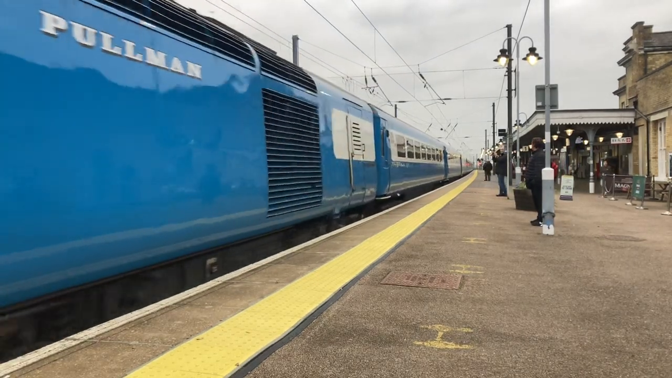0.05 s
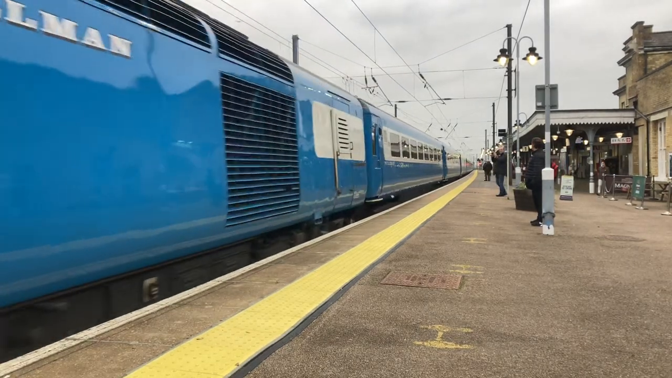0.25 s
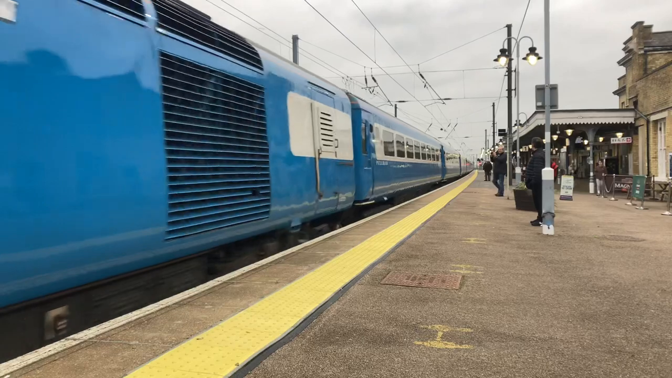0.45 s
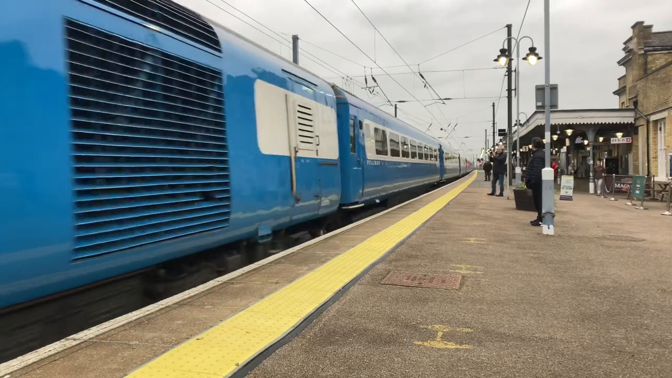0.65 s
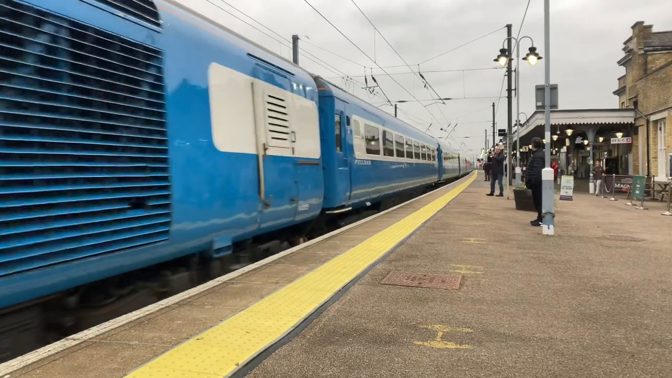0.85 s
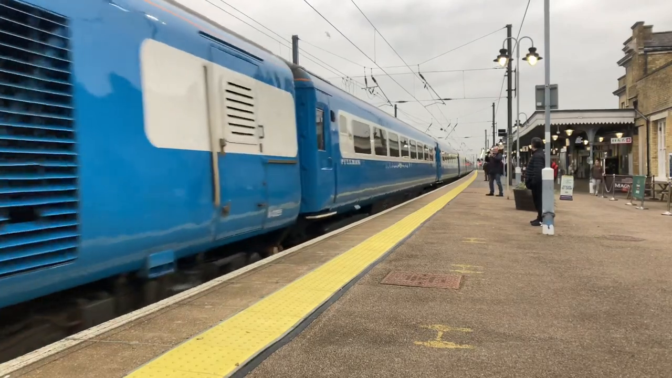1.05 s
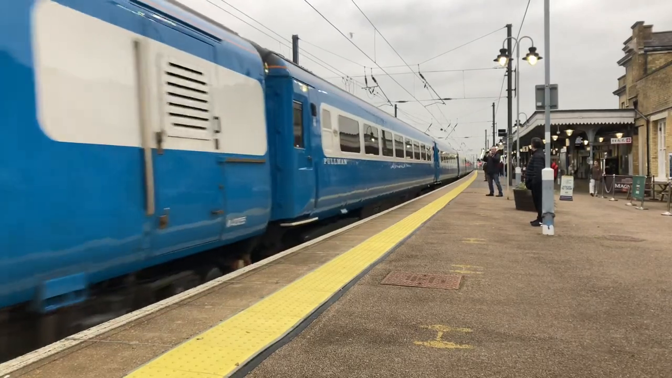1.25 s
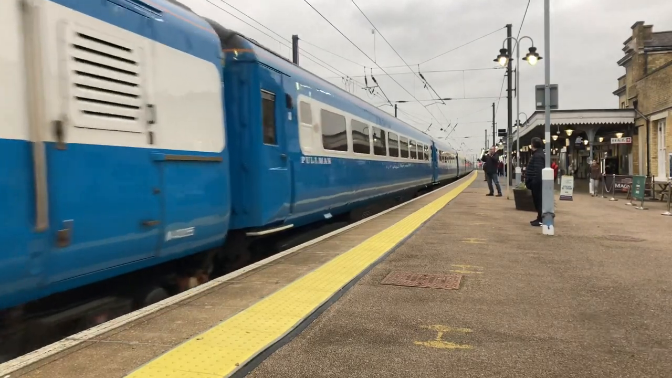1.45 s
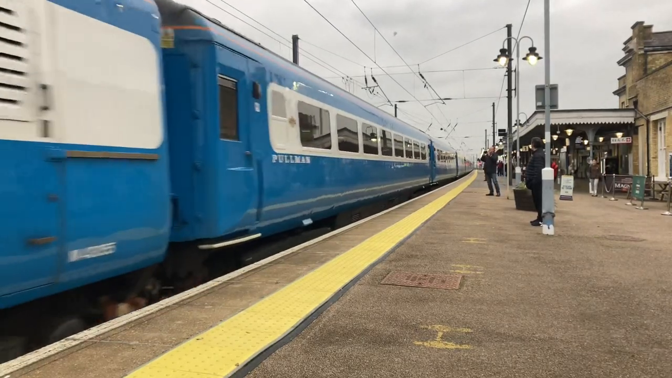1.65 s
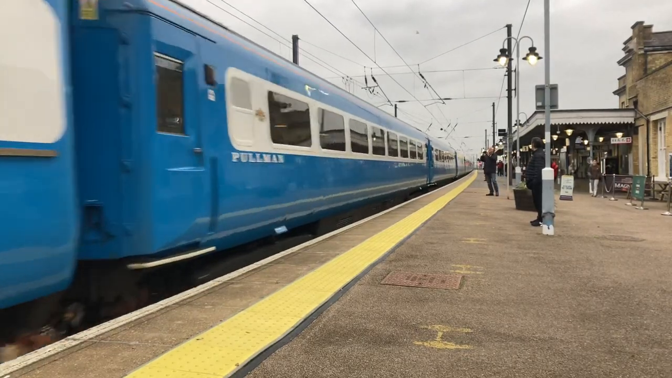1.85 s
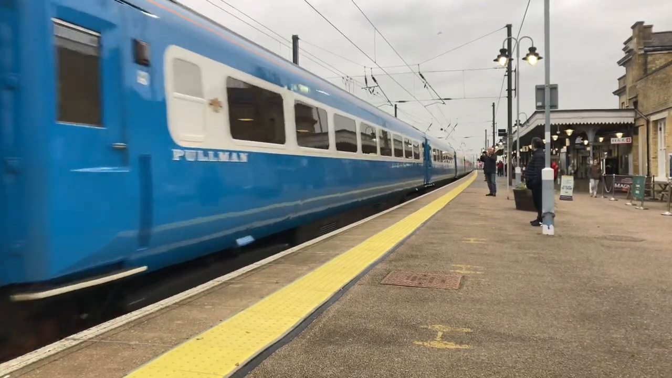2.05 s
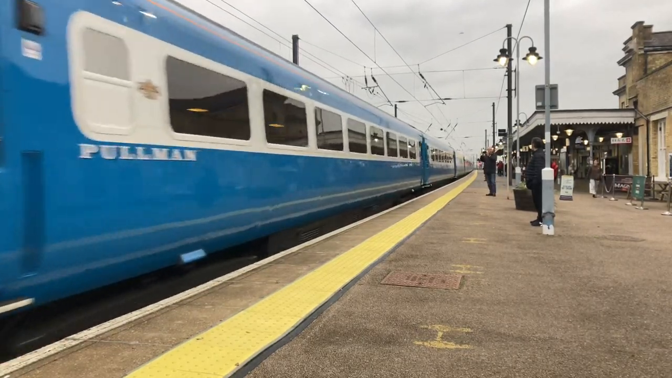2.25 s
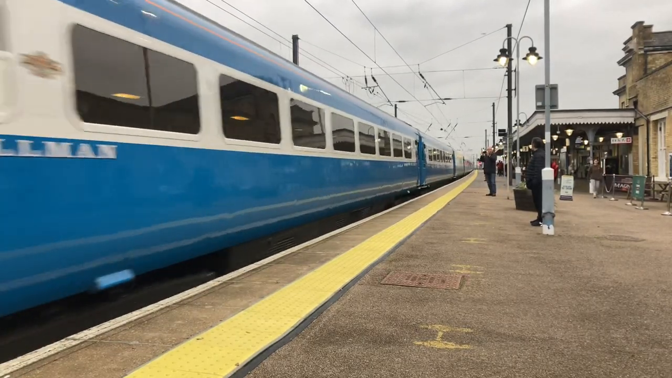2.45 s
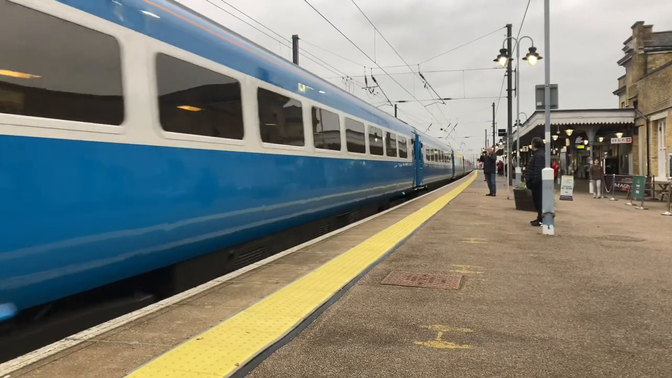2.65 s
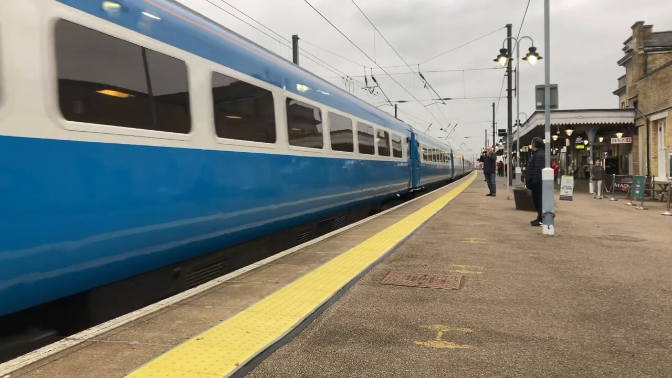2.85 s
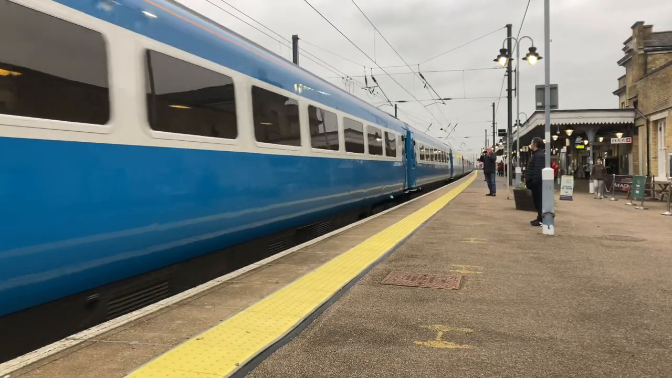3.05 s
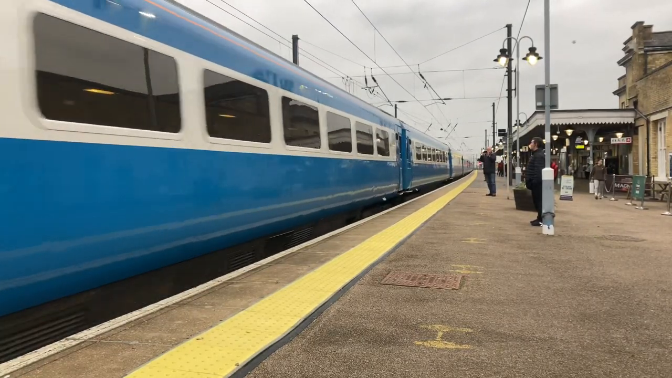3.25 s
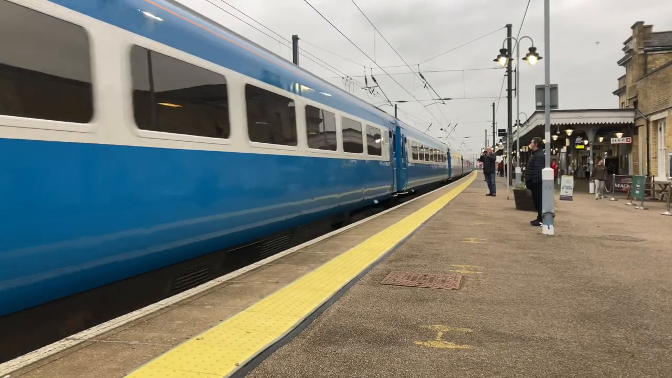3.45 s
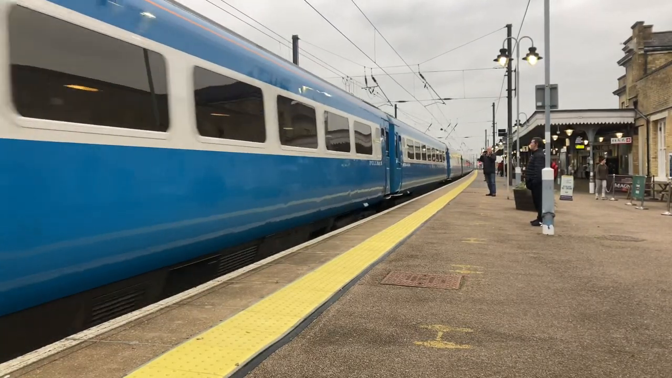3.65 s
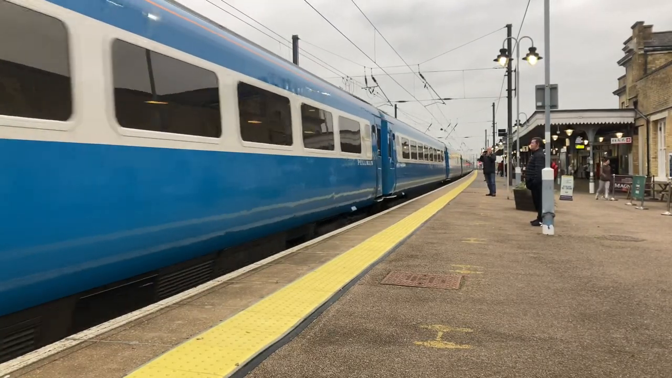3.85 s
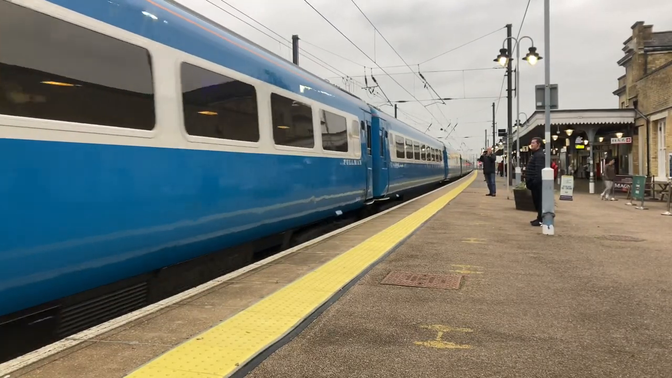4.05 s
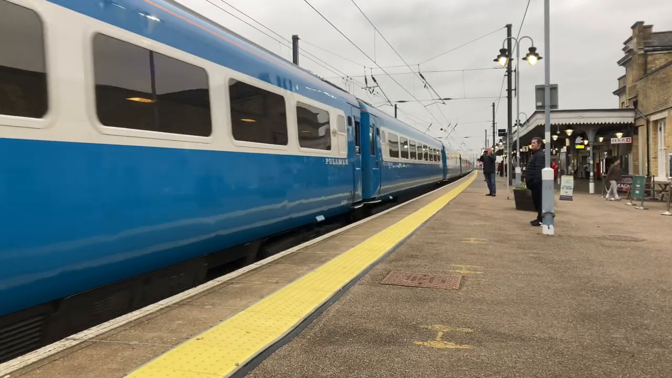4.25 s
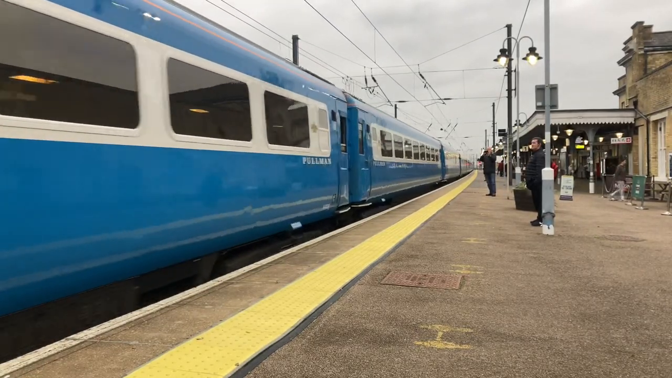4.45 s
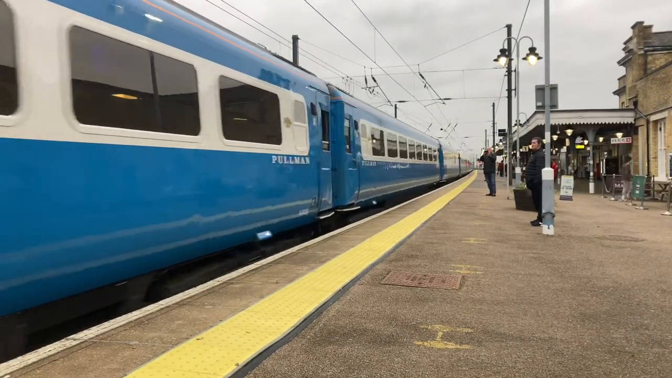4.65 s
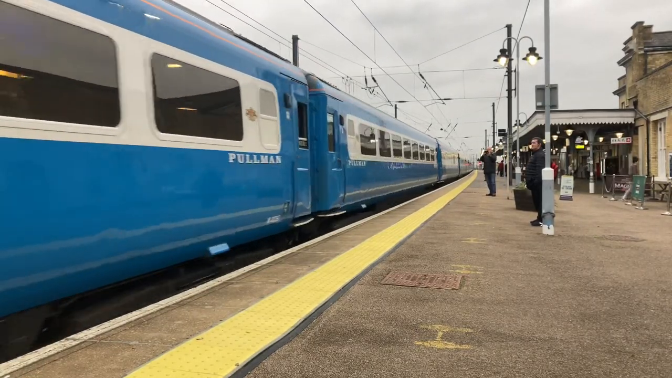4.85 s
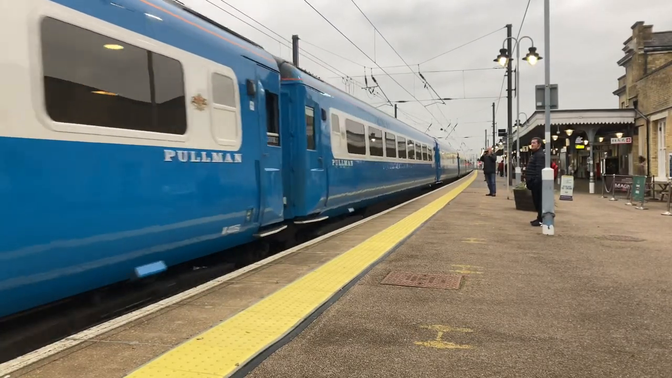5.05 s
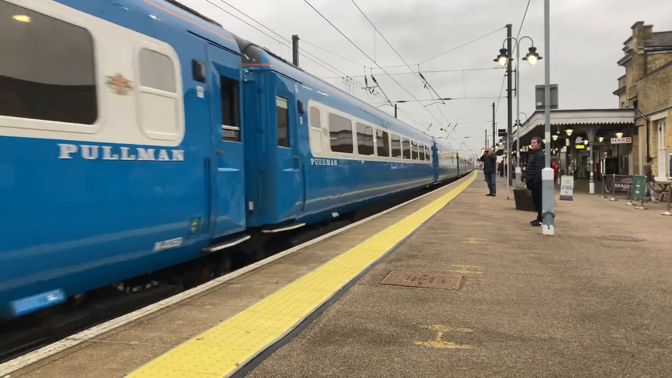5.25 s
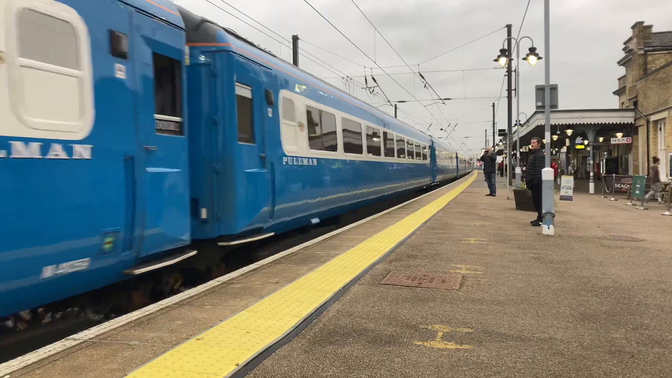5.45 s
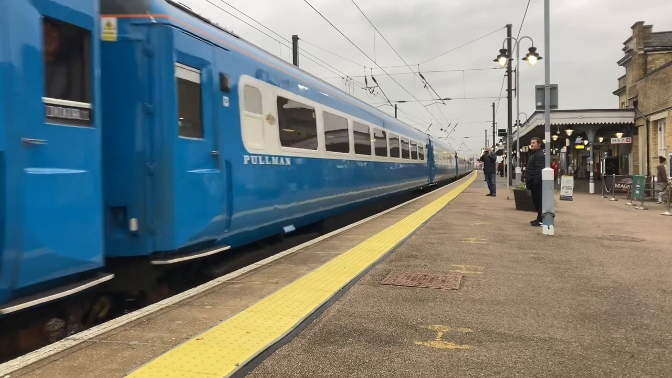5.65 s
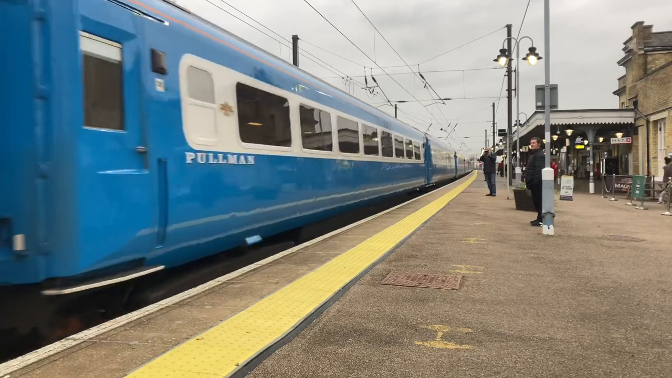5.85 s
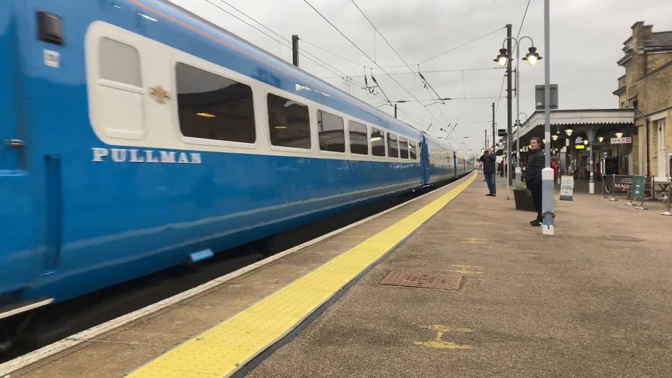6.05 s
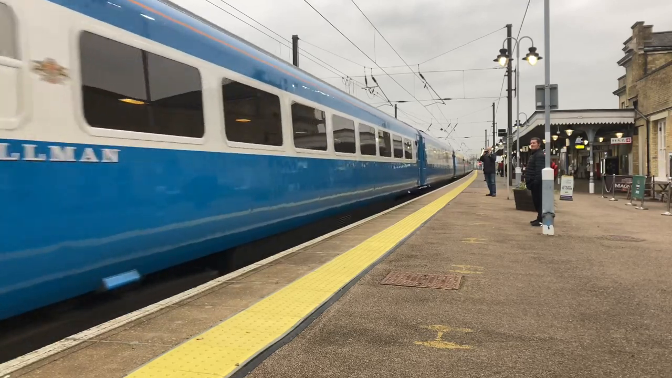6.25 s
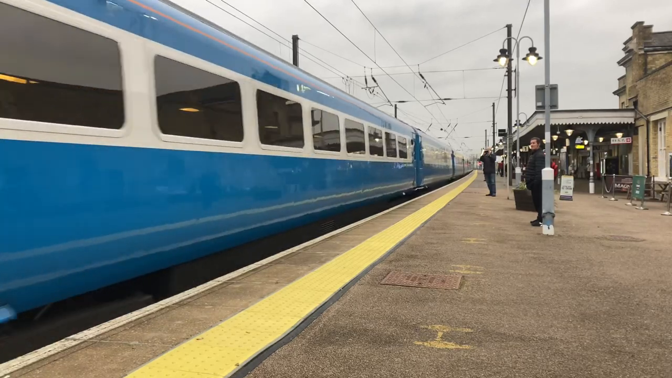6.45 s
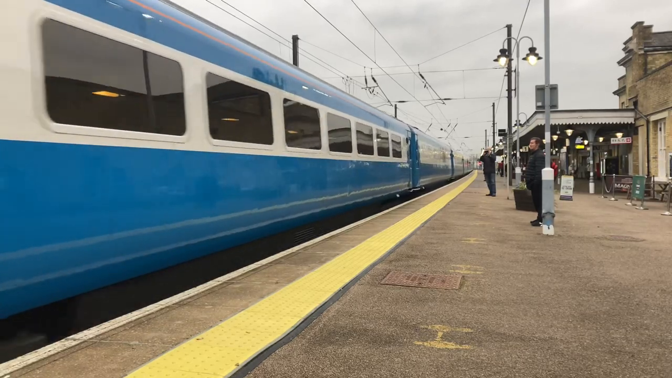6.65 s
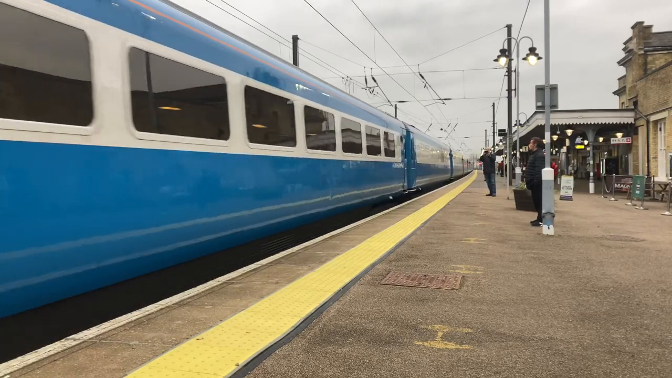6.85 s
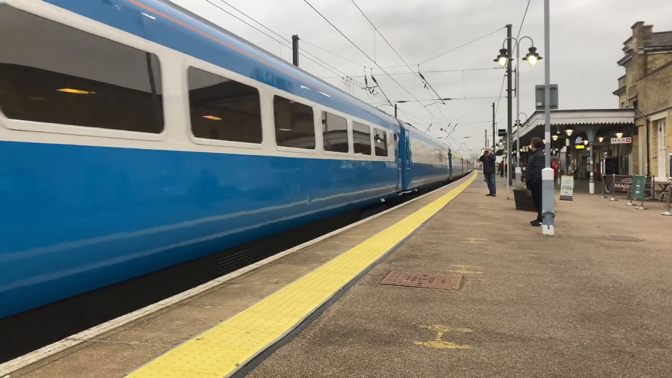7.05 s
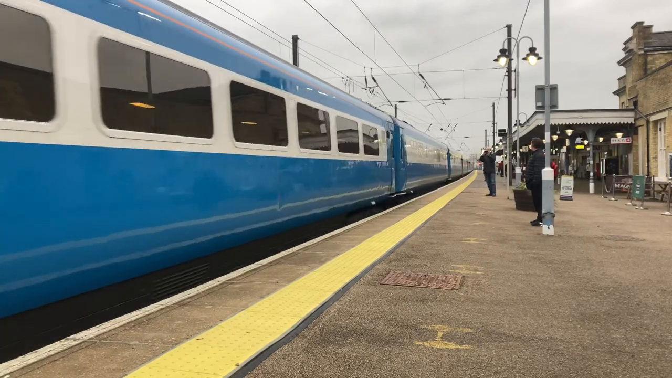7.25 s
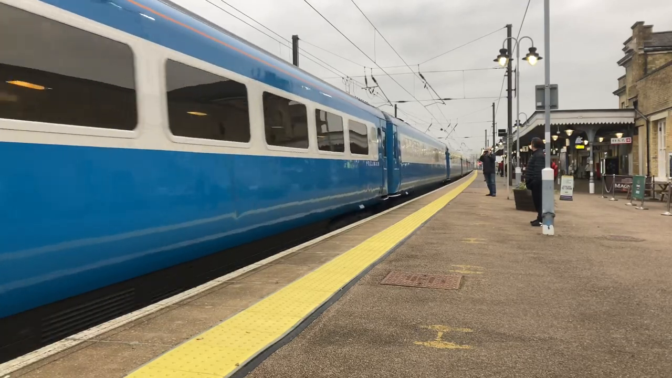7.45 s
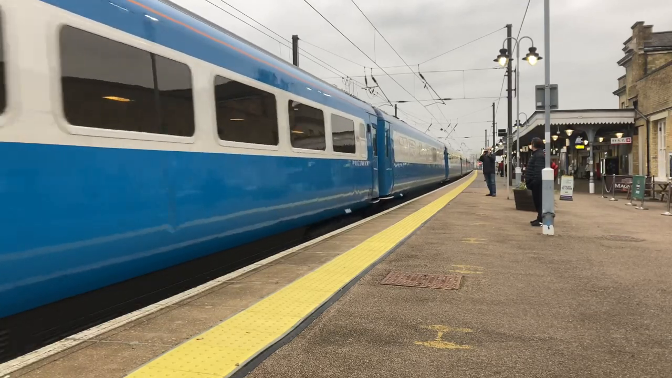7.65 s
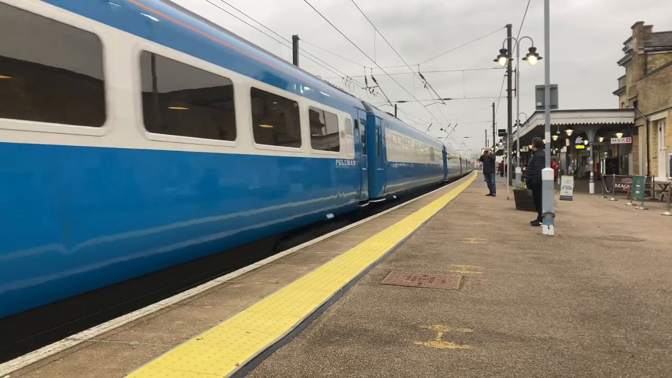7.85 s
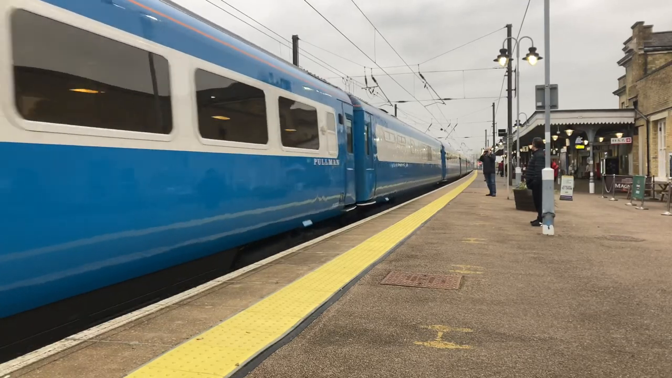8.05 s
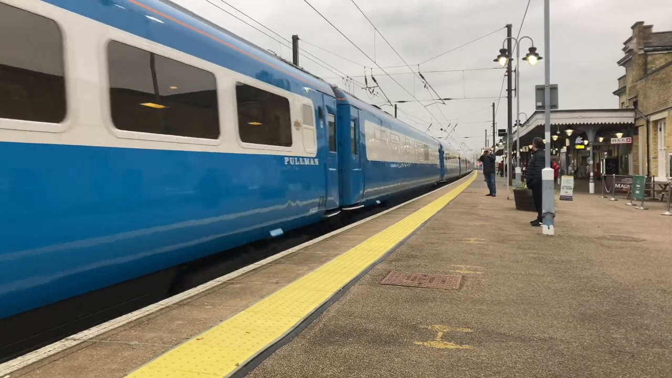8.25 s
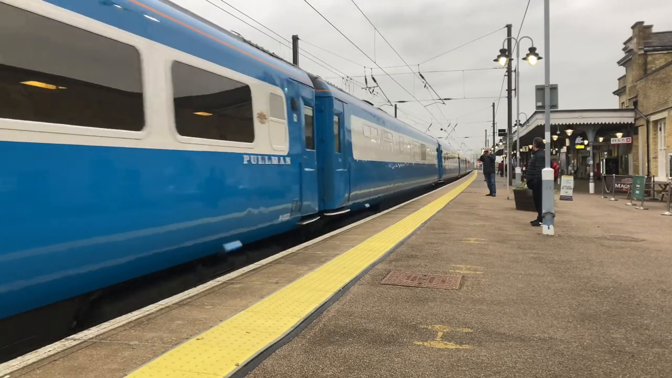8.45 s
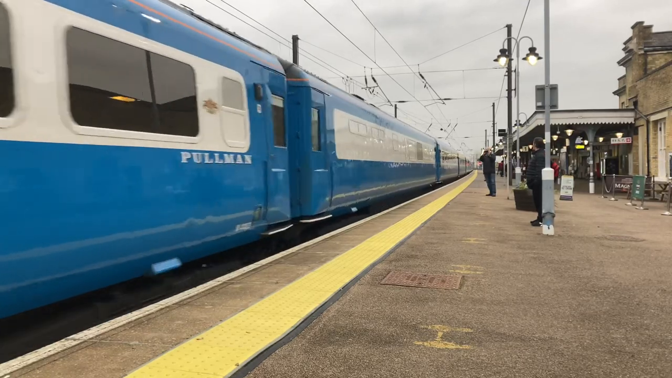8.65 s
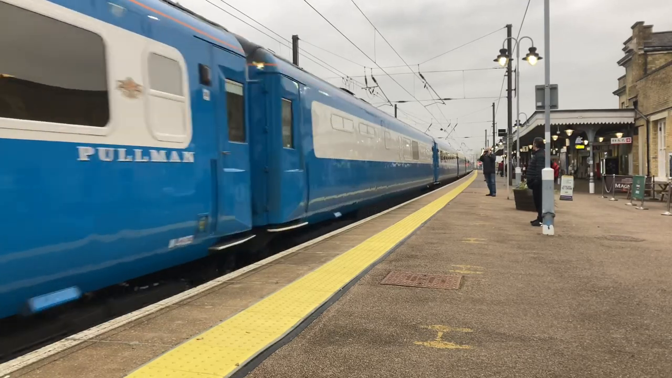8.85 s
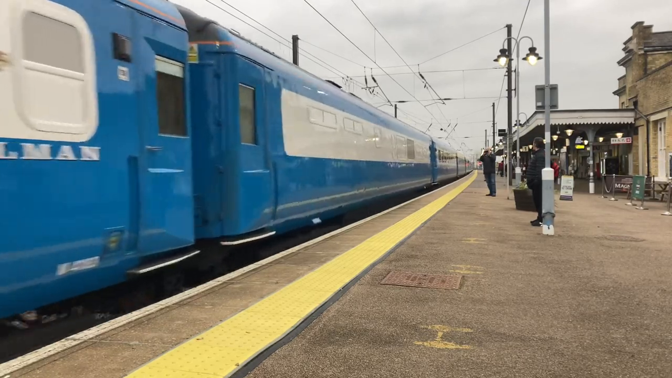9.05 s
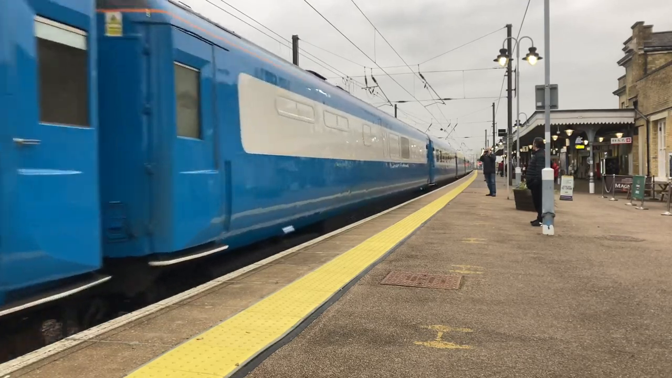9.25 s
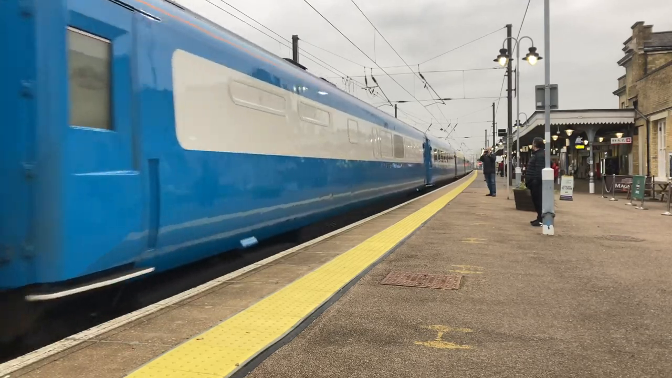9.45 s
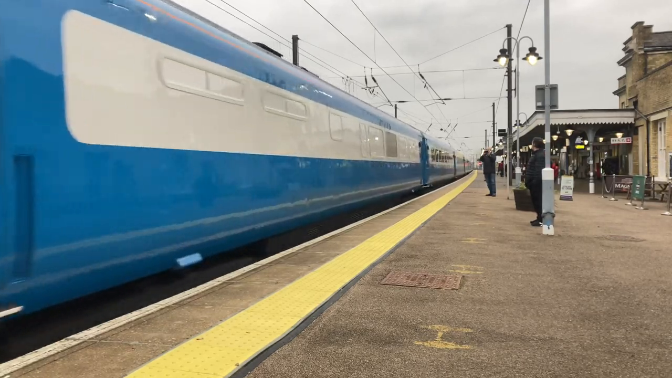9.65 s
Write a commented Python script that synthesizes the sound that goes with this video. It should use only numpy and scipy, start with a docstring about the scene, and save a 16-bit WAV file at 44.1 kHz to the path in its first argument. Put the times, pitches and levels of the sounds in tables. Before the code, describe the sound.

Outdoor station platform, stereo microphone close to the track. From 0 s a diesel power car is already alongside and very loud: a low throbbing drone near 45 Hz, a thick mid-range roar of exhaust and fans, and a fuzzy whine around 3 kHz. An airy rush from the side grille peaks near 0.7 s; the whine flares and flutters around 1 s. From 1.2 to 3 s everything falls away, the whine sagging in pitch as coaches screen the engine. A brief steely hiss comes at 2.3 s. Afterwards a quiet, low rolling rumble dominates, with faint wheel ringing and a distant engine hum slowly rising in pitch. Soft hisses return around 4.3-4.9, 5.3-6.1 and 8.8-9.5 s. Dull, deep joint thumps come irregularly from 4.1 s, strongest near 6.9 s, with tiny scrapes at 7.7 and 8.6 s. The rumble continues to the end, about 9.7 s.

```python
"""A diesel passenger train gathers speed along a station platform, close to a stereo microphone.
First the power car passes: sine waves make its droning engine note, shaped noise its roar and whine.
Under it lies the coaches' rolling rumble, and narrow noise bands and steady hums come and go.
As the power car draws away, bouts of steely hiss (high noise) mark the bogies, the wheeled frames.
Later come dull thumps, short low sine bursts, as wheels cross rail joints, and a few brief scrapes."""
import sys
import numpy as np
from scipy import signal
from scipy.fft import rfft, irfft, next_fast_len
from scipy.io import wavfile
from scipy.ndimage import uniform_filter1d, minimum_filter1d

SR = 44100
rng = np.random.default_rng(int(sys.argv[2]) if len(sys.argv) > 2 else 0)


def unload_wav(signal):
    """Save mono or channel-first audio to the path in sys.argv[1] as 16-bit WAV at rate SR, clipped to [-1, 1]."""
    wavfile.write(
        sys.argv[1],
        SR,
        np.round(np.clip(np.atleast_2d(signal).T, -1, 1) * 32767).astype(np.int16),
    )


N = 428211

# How fast the diesel fires. Each row: time in seconds, firings per second.
FIRING_RATE = [(0, 43.3), (0.7, 44.1), (1.3, 45.4), (1.85, 47.1), (2.56, 49.2), (3.5, 49.4), (4.7, 49.2),
               (6.2, 52.4), (7.35, 56.1), (8, 57.2), (9.7, 56.5)]
# Engine note before DRONE_TRIM_DB. Each row: time in seconds, level in dB.
DRONE_LEVEL = [(0, -13), (0.8, -13.5), (1.3, -18), (1.9, -19), (2.5, -26), (3.6, -36), (4.3, -31.5),
               (5.5, -31), (5.8, -25), (6.1, -25), (6.4, -33), (7.2, -29.5), (7.5, -37), (8, -35.0),
               (8.6, -47), (9.7, -33.5)]
# Overtones of the engine note; uneven cylinders add some between the whole multiples.
# Each row: multiple of the firing rate, level in dB against the main note.
EXHAUST_OVERTONES = [(1.5, -19), (2, -18.5), (2.5, -23.5), (3, -22)]
# Tone colour of the roar, then of the air hiss. Each row: pitch in Hz, relative level in dB.
ROAR_SPECTRUM = [(35, -31), (62, -10), (100, -16.5), (170, -15), (240, -13), (320, -16), (440, -16.5),
                 (570, -19), (650, -22), (915, -21.5), (1460, -24), (1540, -31.5), (2300, -41.5),
                 (3500, -94)]
AIR_SPECTRUM = [(1000, 0), (2000, 8.5), (2500, 13), (3500, 3.5), (4000, 1.5), (5800, 2), (7200, 0.5),
                (8100, -11), (8900, -46), (11000, -11.5), (14500, -42), (16000, -41)]
# Resonances of the power car's body. Each row: pitch in Hz, width in Hz, lift in dB.
BODY_RESONANCES = [(220, 37, 2), (310, 26, 6), (508, 31, 3.5), (566, 45, 4), (884, 38, 2.5),
                   (1420, 110, 0.5)]
# Shaking of the roar by the firings. Each row: multiple of the firing rate, depth in dB.
ROAR_BEATS = [(1, 1.2), (1.5, 2.2)]
# Pulsing of the intake with the engine. Each row: multiple of the firing rate, share of the depth.
INTAKE_BEATS = [(1 / 6, .8), (1 / 2, .7), (1, .35)]
# Path of the whine, before its waver and WHINE_TRIM_DB.
# Each row: time in seconds, pitch in Hz, level in dB.
WHINE_PATH = [(0, 2924, -31.5), (0.75, 3000, -34), (0.86, 2960, -27.5), (0.99, 2980, -25),
              (1.05, 2940, -33.5), (1.12, 2986, -28), (1.35, 2905, -29), (1.52, 2980, -30.5),
              (1.58, 2965, -34), (2.12, 2944, -34.5), (2.25, 2910, -38.5), (2.42, 2900, -38.5),
              (2.6, 2790, -42.5), (2.85, 2763, -44.5), (3.2, 2690, -50), (4.15, 2730, -50),
              (4.5, 2900, -48.5), (5.1, 2970, -49.5), (5.65, 3020, -49), (6.1, 2890, -53.5),
              (7.5, 2870, -53.5), (8.3, 2760, -60.5), (9.04, 2810, -56), (9.7, 2780, -60)]
# Parts of the whine. Each row: multiple of its pitch, width in Hz before blurring, relative level in dB.
WHINE_PARTS = [(0.998, 185, 5.5), (1.68, 510, -18), (2.35, 384, -25)]
# Flutter of the whine, strong near by. Each row: time in seconds, depth in dB before the shares.
WHINE_FLUTTER = [(0, 1.2), (.8, 1.4), (1.1, 2), (2.3, 2), (3, .5), (5.5, .6), (6.5, .9)]
# Stereo picture of the power car: side over middle, then left over right.
# Each row: pitch in Hz, difference in dB.
POWER_CAR_SIDE = [(60, -8), (100, -2), (180, -2.5), (300, 2.5), (510, 7.5), (880, 8.5), (1500, 7.5),
                  (2000, 2.5), (2560, -5), (3600, 4), (4370, 2), (7470, 0.5)]
POWER_CAR_LEFT = [(60, -2), (100, -4.5), (180, 4.5), (300, 3.5), (510, 3.5), (880, 3.5), (1500, -3),
                  (2560, 2), (4370, -1), (7470, 0)]
# Widening of the power car's sound. Each row: time in seconds, side lift in dB around 600 Hz.
POWER_CAR_SPREAD = [(0, -13), (.6, -5.5), (1.2, 3), (2, 7), (3, 4.5), (5, 4.5)]
# Tone colour of rolling. Each row: pitch in Hz, relative level in dB.
ROLLING_SPECTRUM = [(32, -26), (50, -3), (114, -9.5), (262, -13.5), (340, -22), (410, -23), (600, -29),
                    (900, -32.5), (1350, -34.5), (1700, -38.5), (2400, -37.5), (3000, -39.5), (4200, -45),
                    (6000, -97)]
# Ringing of the wheels. Each row: pitch in Hz, width in Hz, lift in dB.
WHEEL_RESONANCES = [(395, 57, 1), (874, 170, 4), (1680, 150, 1), (2025, 180, 4.5), (2210, 130, 2.5)]
# Stereo picture of the coaches: side over middle, then left over right.
# Each row: pitch in Hz, difference in dB.
COACHES_SIDE = [(60, -13), (100, -7.5), (180, -5.5), (300, 2.5), (510, 7.5), (880, 6.5), (1500, 5.5),
                (2560, -0.5), (4370, 0), (7470, 18.5)]
COACHES_LEFT = [(60, -5), (100, -6), (180, 3), (300, 1.5), (510, 1), (880, 3), (1500, -1.5), (2560, -0.5),
                (4370, 0), (7470, 2)]
# Bouts of steel rubbing on steel as bogies go by.
# Each row: start in seconds, length in seconds, hiss level in dB, fine sizzle level in dB.
RUBBING_BOUTS = [(2.346, 0.067, -52, -60.5), (4.347, 0.52, -56, -66), (5.287, 0.84, -58, -66),
                 (8.81, 0.66, -55.5, -73.5)]
# Tone colour of the hiss, then of the sizzle. Each row: pitch in Hz, relative level in dB.
HISS_SPECTRUM = [(2200, -0.5), (3300, 3), (3900, 0.5), (4500, 8), (5000, 6), (5800, 2), (6900, 3.5),
                 (8200, 9.5), (10000, -64)]
SIZZLE_SPECTRUM = [(5000, -34), (7500, -16), (9000, -16), (11300, 8), (13000, -20), (15500, -5.5)]
# Harder rubbing brightens the hiss. Each row: sizzle level in dB, top edge of the hiss in Hz.
HISS_EDGE = [(-94, 6400), (-69.5, 7070)]
# Brief scrapes of steel. Each row: middle in seconds, length in seconds, pitch in Hz, width in Hz,
# level in dB before a gentle treble cut.
STEEL_SCRAPES = [(7.727, 0.024, 2120, 330, -41), (7.731, .03, 3300, 900, -49),
                 (8.59, 0.069, 4760, 1500, -49)]
# Narrow bands of noise that come and go: flares of the whine, singing wheels, patches of hiss.
# Each row: start in seconds, end in seconds, pitch in Hz, width in Hz, level in dB.
NARROW_BANDS = [(0.39, 0.91, 4880, 250, -40.5), (1.0, 2.018, 4970, 279.3, -42),
                (1.18, 1.38, 4900, 416.7, -39.5), (2.2, 5.44, 1265, 140, -54.5),
                (1.86, 4.04, 6320, 324.1, -55.5), (2.86, 5.4, 4750, 432, -55.5),
                (2.96, 5.84, 420, 46.54, -52), (4.02, 5.04, 3650, 260, -54.5), (5.1, 5.65, 6760, 800, -59),
                (8.648, 9.9, 313, 110, -45), (5.85, 6.25, 720, 400, -52), (2.3, 3.3, 814, 200, -56),
                (8.3, 9.94, 884, 118.7, -51), (8.652, 9.9, 2120, 240, -53.5), (8.7, 8.92, 6500, 700, -55),
                (8.9, 9.12, 5700, 1100, -50.5)]
# Wheels crossing rail joints.
# Each row: time in seconds, boom level in dB, boom pitch in Hz, knock level in dB.
JOINT_THUMPS = [(4.145, -29, 50, -34), (4.824, -26, 45.2, -22), (5.24, -27, 45.7, -49),
                (5.344, -21, 46.3, -39), (6.515, -23.5, 48, -35), (6.891, -16, 52, -24.5),
                (7.001, -19.5, 46.7, -40.5), (7.41, -38, 47, -28), (7.66, -23.5, 47.3, -26),
                (8.11, -24.5, 45.5, -31), (8.78, -35, 47, -19), (9.336, -38, 47, -29),
                (9.58, -31, 47, -28.5)]
# Steady hums, many of them overtones of the engine.
# Each row: start in seconds, end in seconds, middle pitch in Hz, level in dB.
STEADY_HUMS = [(-1, 0.46, 144, -32), (-0.4, 1.1, 222, -28.5), (0.73, 1.7, 319, -33), (2, 3.14, 132, -39),
               (4.2, 5.2, 133, -35.5), (2, 5.4, 149, -41), (2, 12, 231, -47), (2.6, 3.54, 450, -47),
               (1.62, 2.28, 261, -37), (2, 3.6, 496, -44), (3, 3.46, 679, -46), (3.5, 4.08, 250, -46),
               (5.5, 5.8, 187, -36.5), (6.5, 7.1, 162.8, -37.5), (5.6, 7.6, 380, -53), (6, 7.5, 530, -53.5),
               (7.5, 8.85, 87, -41), (8, 8.4, 262, -39.5)]

# Time grids in seconds and pitch grid in Hz; noise is built in short overlapping frames (in samples)
FRAME, HOP = 2048, 256
T = np.arange(N) / SR
FRAME_T = np.arange(N // HOP + 3)[:, None] * HOP / SR
HZ = np.fft.rfftfreq(FRAME, 1 / SR)

# Engine note: level trim, and how much each side moves to put it right of centre
DRONE_TRIM_DB, DRONE_PAN_DB = -0.36, 1.4
# Its overtones grow once the car is past: dB (before, after), change in seconds (from, to)
REEDY_DB, REEDY_S = (0, 3), (1, 1.2)
# Far off it arrives by many shifting paths: depth of fading, onset in seconds (from, to)
FADING_DB, FADING_S = 1, (2.2, 4)
# Upper partials: unevenness, and level of the lines between the crankshaft's multiples
SCATTER_DB, BETWEEN_DB = 2.2, -9
# Firings in two turns of the crankshaft; time in which the paths to the microphone change
FIRINGS_PER_CYCLE, PATH_CHANGE_S = 6, .6
# Passing sources: nearest at s, time to cover their distance in s, steepness, dB when nearest
ROAR_PASS = (0.19, 1.03, 2, -18.5)  # fans and exhaust
AIR_PASS = (0.68, 1.21, 3, -44.5)  # side grille, soon screened by the coaches
# The coaches screen the power car: depth, onset in seconds (from, to), and where it starts in the noise
SCREEN_DB, SCREEN_S, SCREEN_HZ = -5, (1.08, 2.18), 200
# Body resonances fade as its side turns from the platform, in seconds (from, to)
BODY_FADE_S = (1.3, 5.2)
THROB_TOP_HZ, AIR_FLUTTER_DB = 1600, 1  # firings shake what lies below; the air hiss flutters above
# Whine: level trim, pitch drift, irregular bursts as a share of the flutter depth
WHINE_TRIM_DB, WAVER_HZ, GUST_SHARE = 0.9, 22, .55
WHINE_TOP_HZ, BLUR_PER_HZ = 2980, 0.0016  # its bands widen as the pitch dips below this top
# Coaches: levels of rumble and ringing; the first swell of coach-end sound, then one every COACH_S
RUMBLE_DB, RAIL_DB, FIRST_END_S, COACH_S = -35, -45, 2.94, 3.02
RAIL_SWELL_DB, RUMBLE_DIP_DB = 1.05, 0.5  # at coach ends the wheels are louder, the bodies quieter
# The first coach sounds duller: weak band (Hz, width Hz, dB), which fills in (from s, to s)
DULL_BAND, DULL_UNTIL_S = (279, 75, -6.5), (4.7, 5)
RUB_RISE_DB_PER_S, HISS_FALL_DB_PER_S, SIZZLE_FALL_DB_PER_S = 43, 4.5, 40
SIZZLE_REST_DB = -90  # the sizzle between bouts
UNEVEN_DB, UNEVEN_HZ = 2.2, 12  # unevenness of the narrow bands: depth and rate
BOOM_RISE_S, KNOCK_MIDDLE_HZ, KNOCK_DECAY_S = 0.039, 148.7, 0.01
# Noise: depth of the fine ripple, setting of the left-right phase pattern, top of the sound
RIPPLE_DB, STEREO_LAG_MS, TOP_EDGE_HZ = 1.9, 0.392, 15600


def exhaust():
    """Puffs from the cylinders make a note at the firing rate, with overtones and a thicket above."""
    firing_hz = follow(FIRING_RATE, T)[0]
    level_db = follow(DRONE_LEVEL, T)[0] + DRONE_TRIM_DB
    turn = 2 * np.pi * np.cumsum(firing_hz * (1 + .002 * wander(rate_hz=6))) / SR
    overtone_gain = amp(np.interp(T, REEDY_S, REEDY_DB))
    note = np.sin(turn) * (1 + 0.042 * wander(rate_hz=4.2))
    for multiple, overtone_db in EXHAUST_OVERTONES:
        overtone = np.sin(multiple * turn + 2 * np.pi * rng.random())
        note += amp(overtone_db) * overtone_gain * (1 + 0.3 * wander(rate_hz=9.0)) * overtone
    fading_db = FADING_DB * ramp(FADING_S, T) * wander(rate_hz=6.1)
    drone = np.sqrt(2) * note * amp(level_db + fading_db) * amp([[-DRONE_PAN_DB], [DRONE_PAN_DB]])
    thicket = cylinders(turn) * amp(passing(ROAR_PASS, T) + screening(T))
    return drone + thicket * amp([[1.5], [-1.5]])


def cylinders(turn):
    """Unequal firings repeat every engine cycle, giving many close lines that shift as the car moves."""
    size = 8192  # samples in one engine cycle
    k = np.arange(size // 2 + 1)
    typical_hz = follow(FIRING_RATE, ROAR_PASS[0] + ROAR_PASS[1] / 2)[0]
    hz = k * typical_hz / FIRINGS_PER_CYCLE
    body_db = np.interp(hz, HZ, colour(ROAR_SPECTRUM) + lifts(BODY_RESONANCES))
    # odd lines fall between the crankshaft's multiples
    body = amp(body_db + BETWEEN_DB * (k % 2)) * (hz > 135) * (hz < 1500)
    apart = np.array([[1], [-1]]) * np.minimum(hz / 450, 1.1)
    lines = body * np.exp(1j * (2 * np.pi * rng.random(len(k)) + apart))
    place = turn / (2 * np.pi * FIRINGS_PER_CYCLE) % 1 * size
    out = np.zeros((2, N))
    # fade from one set of line levels to the next
    for s in np.arange(0, T[-1] + PATH_CHANGE_S, PATH_CHANGE_S):
        near = np.abs(T - s) < PATH_CHANGE_S
        fade = 1 - np.abs(T[near] - s) / PATH_CHANGE_S
        scatter = amp(SCATTER_DB * rng.standard_normal((2, len(k))))
        cycle = evened(irfft(lines * scatter))
        for side in range(2):
            out[side, near] += fade * np.interp(place[near], np.arange(size), cycle[side], period=size)
    return evened(out)


def power_car():
    """Fans and exhaust stir the air into noise; the body colours it and the firings shake it."""
    body_lift = lifts(BODY_RESONANCES) * (1 - ramp(BODY_FADE_S, FRAME_T))
    roar = within(amp(colour(ROAR_SPECTRUM) + body_lift), (180, 1450))
    air = within(amp(colour(AIR_SPECTRUM)), (3500, 4400))
    screen_db = screening(FRAME_T) * above(SCREEN_HZ)
    roar = roar * amp(passing(ROAR_PASS, FRAME_T) + screen_db)
    air = air * amp(passing(AIR_PASS, FRAME_T))
    side_db = colour(POWER_CAR_SIDE) + follow(POWER_CAR_SPREAD, FRAME_T)[0] * peak(600, 2200)
    rush = turbulence(np.hypot(roar, air), side_db, colour(POWER_CAR_LEFT), patchy_db=.9)
    low = signal.sosfiltfilt(signal.butter(3, THROB_TOP_HZ, fs=SR, output="sos"), rush)
    fluttering_high = (rush - low) * amp(AIR_FLUTTER_DB * beating(INTAKE_BEATS))
    return fluttering_high + low * evened(amp(beating(ROAR_BEATS)))


def whine():
    """Three fuzzy bands of noise glide together, fluttering with the intake most strongly near by."""
    hz, db = follow(WHINE_PATH, FRAME_T)
    hz = hz + WAVER_HZ * np.interp(FRAME_T, T, wander(rate_hz=12))
    blur = 1 + BLUR_PER_HZ * np.maximum(WHINE_TOP_HZ - hz, 0)
    shape = sum(amp(level) * peak(k * hz, width * blur) for k, width, level in WHINE_PARTS)
    shape = shape * amp(-6 * peak(1.3 * hz, 545))  # a dip between the first two parts
    shape = within(shape, (2600, 3250))
    swing = beating(INTAKE_BEATS) + GUST_SHARE * wander(rate_hz=16.0)
    flutter = amp(follow(WHINE_FLUTTER, T)[0] * swing)
    noise = turbulence(shape * amp(db + WHINE_TRIM_DB), side_db=-2.0, left_db=-1.5, patchy_db=1.0)
    return flutter * noise


def coaches():
    """Rough rail makes the bodies rumble and the wheels ring; the ringing swells at coach ends."""
    at_end = np.cos(2 * np.pi * (FRAME_T - FIRST_END_S) / COACH_S)
    shape = amp(colour(ROLLING_SPECTRUM) + lifts(WHEEL_RESONANCES))
    high = above(350)
    rumble = (1 - high) * within(shape, (90, 300)) * amp(RUMBLE_DB - RUMBLE_DIP_DB * at_end)
    ringing = high * within(shape, (400, 2400)) * amp(RAIL_DB + RAIL_SWELL_DB * at_end)
    dull_db = lifts([DULL_BAND]) * (1 - ramp(DULL_UNTIL_S, FRAME_T))
    size = (rumble + ringing) * amp(dull_db)
    return turbulence(size, colour(COACHES_SIDE), colour(COACHES_LEFT), patchy_db=1.57)


def bogies():
    """Steel rubbing on steel makes a hiss, brighter when rubbed harder, a fine sizzle and scrapes."""
    hiss_power, sizzle_power = 0, amp(SIZZLE_REST_DB) ** 2
    for start, length, hiss_db, sizzle_db in RUBBING_BOUTS:
        hiss_power = hiss_power + amp(hiss_db + bout(start, length, HISS_FALL_DB_PER_S)) ** 2
        sizzle_power = sizzle_power + amp(sizzle_db + bout(start, length, SIZZLE_FALL_DB_PER_S)) ** 2
    edge_hz = follow(HISS_EDGE, 10 * np.log10(sizzle_power))[0]
    hiss = amp(colour(HISS_SPECTRUM)) / np.sqrt(1 + (HZ / edge_hz) ** 30)
    hiss = within(hiss, (5200, 7600))
    sizzle = within(amp(colour(SIZZLE_SPECTRUM)), (10000, 12500))
    size = np.sqrt(hiss ** 2 * hiss_power + sizzle ** 2 * sizzle_power)
    out = turbulence(size, side_db=-1.0, left_db=-.5, patchy_db=2.0)
    treble_cut = signal.butter(4, 6500, fs=SR, output="sos")
    for middle, length, hz, width, db in STEEL_SCRAPES:
        scrape = signal.sosfilt(treble_cut, band_noise(hz, width))
        out += amp(db) * scrape * np.exp(-2 * ((T - middle) / length) ** 2)
    return out


def bout(start, length, fall_db_per_s):
    """Level in dB of one rub: quick rise, hold, then a fall."""
    early = np.maximum(start - FRAME_T, 0)
    late = np.maximum(FRAME_T - start - length, 0)
    return -RUB_RISE_DB_PER_S * early - fall_db_per_s * late


def narrow_bands():
    """Flares of the whine, singing wheels and patches of hiss: narrow noise, uneven in level."""
    out = np.zeros((2, N))
    for start, end, hz, width, db in NARROW_BANDS:
        mid, side = band_noise(hz, width)
        side = side * amp(np.interp(hz, HZ, colour(COACHES_SIDE)) - 11.0)
        uneven = evened(amp(UNEVEN_DB * wander(rate_hz=UNEVEN_HZ)))
        out += amp(db) * swell(start, end) * uneven * np.array([mid + side, mid - side])
    return out


def joints():
    """A wheel dropping into a joint sets the track bed booming, with a short dull knock."""
    out = np.zeros(N)
    t = np.arange(SR // 3) / SR
    for s, boom_db, boom_hz, knock_db in JOINT_THUMPS:
        boom_shape = (t / BOOM_RISE_S * np.exp(1 - t / BOOM_RISE_S)) ** 2
        boom = boom_shape * np.sin(2 * np.pi * boom_hz * t)
        knock_hz = KNOCK_MIDDLE_HZ * (.5 + rng.random())  # half to one and a half times the middle
        knock = np.exp(-t / KNOCK_DECAY_S) * np.sin(2 * np.pi * knock_hz * t)
        part = out[round((s - .008) * SR):][:len(t)]  # a view: adding to it adds to out
        part += (amp(boom_db) * boom + amp(knock_db) * knock)[:len(part)]
    return out * amp([[-1.5], [1.3]])


def hums():
    """Steady hums, many of them overtones of the engine, as sine tones that swell and fade."""
    out = np.zeros((2, N))
    for start, end, hz, db in STEADY_HUMS:
        turn = 2 * np.pi * np.cumsum(hz + 1.24 * wander(rate_hz=4.14)) / SR
        apart = np.array([[1], [-1]]) * min(hz / 450, 1)  # higher hums differ more in phase, left to right
        out += amp(db) * swell(start, end) * np.sqrt(2) * np.sin(turn + apart)
    return out


def turbulence(magnitude, side_db, left_db, patchy_db):
    """Churning air or rough contact as patchy stereo noise with a given, changing spectrum."""
    a, b, c, d, patches, paths = rng.standard_normal((6, len(FRAME_T), len(HZ)), dtype=np.float32)
    patches = evened(smoothed(patches, 10, 20))
    # reflections between train and platform leave a fine ripple that shifts slowly as the train moves
    ripple = evened(smoothed(paths, 90, 2)) * np.minimum(HZ / 400, 1)
    size = magnitude * evened(amp(patchy_db * patches + RIPPLE_DB * ripple))
    spread = amp(side_db)
    lean = np.tanh(np.log(amp(left_db))) * (1 + spread ** 2) / (2 * spread)
    lean = np.clip(lean, -.95, .95)
    lead = np.clip(0.73 * np.sin(2 * np.pi * HZ * STEREO_LAG_MS / 10 ** 3), -1, 1)
    mid = a + 1j * b
    # the side signal: a part in step with the middle sets the balance,
    # a part a quarter turn off sets the phase, and the rest is diffuse
    off_step = 1j * lead * mid + np.sqrt(1 - lead ** 2) * (c + 1j * d)
    side = spread * (lean * mid + np.sqrt(1 - lean ** 2) * off_step)
    frames = size * np.array([mid + side, mid - side])
    stereo = signal.istft(frames, nperseg=FRAME, noverlap=FRAME - HOP, time_axis=1, freq_axis=2)[1]
    return stereo[:, :N] * np.sqrt(np.sum(np.hanning(FRAME) ** 2) / HOP)


def smoothed(x, frames, bins):
    """Averages over neighbouring times and pitches."""
    return uniform_filter1d(uniform_filter1d(x, size=frames, axis=0), size=bins, axis=1)


def band_noise(hz, width):
    """Two unrelated noises in one resonance, scaled together to an rms (average strength) of 1."""
    size = next_fast_len(N)
    shape = peak(hz, width, np.fft.rfftfreq(size, 1 / SR))
    return evened(irfft(rfft(rng.standard_normal((2, size))) * shape, size)[:, :N])


def passing(source, t):
    """Level in dB of a source moving by on a straight track: it falls as the distance grows."""
    nearest_s, reach_s, steepness, db = source
    return db - steepness * 10 * np.log10(1 + ((t - nearest_s) / reach_s) ** 2)


def screening(t):
    """Level change in dB as the coaches hide the power car."""
    return SCREEN_DB * ramp(SCREEN_S, t)


def crank(multiple):
    """Phase in radians of a multiple of the firing rate."""
    return 2 * np.pi * multiple * np.cumsum(follow(FIRING_RATE, T)[0]) / SR


def beating(beats):
    """Swing that repeats with the engine: a sum of sines tied to the firing rate."""
    return sum(depth * np.sin(crank(multiple) + 2 * np.pi * rng.random()) for multiple, depth in beats)


def wander(rate_hz):
    """Slow random drift with an rms of 1 over its frames."""
    count = len(FRAME_T)
    shape = peak(0, rate_hz, np.fft.rfftfreq(count, HOP / SR))
    slow = irfft(rfft(rng.standard_normal(count)) * shape, count)
    return np.interp(T, FRAME_T[:, 0], evened(slow))


def swell(start, end):
    """A rounded rise and fall between two times."""
    return np.sqrt(np.abs(np.sin(np.pi * np.clip((T - start) / (end - start), 0, 1))))


def ramp(span, t):
    """Rises from 0 to 1 between two times."""
    return np.interp(t, span, [0, 1])


def follow(rows, t):
    """Reads each column of a table at the points t, joining rows with straight lines."""
    s, *columns = np.transpose(rows)
    return [np.interp(t, s, c) for c in columns]


def colour(points):
    """A spectrum in dB on the pitch grid, joined along a logarithmic pitch scale."""
    f, db = np.transpose(points)
    return np.interp(np.log(HZ + 1), np.log(f + 1), db)


def peak(centre, width, hz=HZ):
    """Strength of a resonance at each pitch, 1 at its centre."""
    return 1 / (1 + (1.54 * (hz - centre) / width) ** 2)


def above(edge_hz):
    """Smooth step from 0 below a pitch to 1 above it."""
    return HZ ** 4 / (HZ ** 4 + edge_hz ** 4)


def lifts(modes):
    """Decibels that resonances add to a spectrum."""
    return sum(db * peak(hz, width) for hz, width, db in modes)


def within(shape, band):
    """Scales a spectrum so that its power inside a band is 1."""
    inside = (HZ >= band[0]) & (HZ <= band[1])
    return shape / np.sqrt((shape ** 2 * inside).sum(-1, keepdims=True) + 1e-20)


def amp(db):
    """Turns decibels into a multiplying factor."""
    return 10 ** (np.asarray(db) / 20)


def evened(x):
    """Scales to an rms of 1."""
    return x / np.sqrt(np.mean(x ** 2) + 1e-20)


def scene():
    """The whole train at the platform edge: all sources added together."""
    train = exhaust() + power_car() + whine() + coaches()
    return train + bogies() + narrow_bands() + joints() + hums()


def record(dry):
    """The microphone sheds the deepest bass, a limiter eases the tallest peaks, then the top is cut."""
    thin = signal.sosfilt(signal.butter(6, 33, "highpass", fs=SR, output="sos"), dry)
    room = np.minimum(.93 / (np.abs(thin).max(0) + 1e-9), 1)
    held = thin * uniform_filter1d(minimum_filter1d(room, size=301), size=301)
    top_cut = signal.firwin(511, TOP_EDGE_HZ, window=("kaiser", 9), fs=SR)
    return signal.oaconvolve(held, top_cut[None], "same")


dry = scene()
out = record(dry)
unload_wav(out)
```